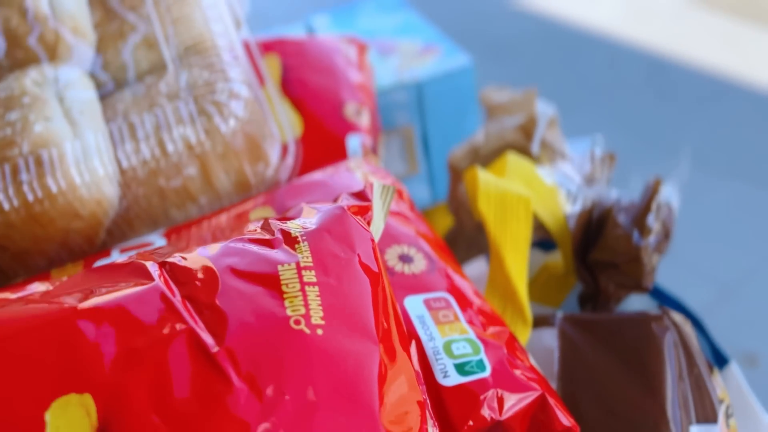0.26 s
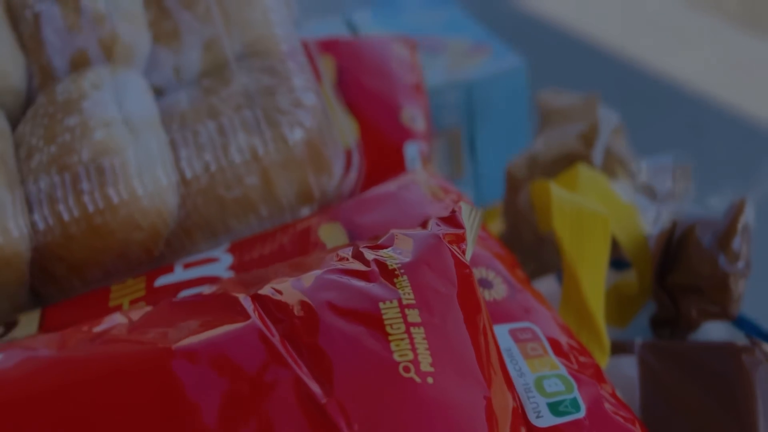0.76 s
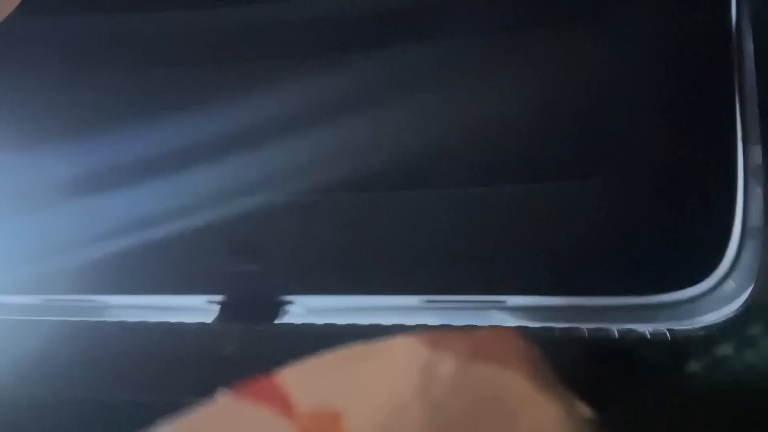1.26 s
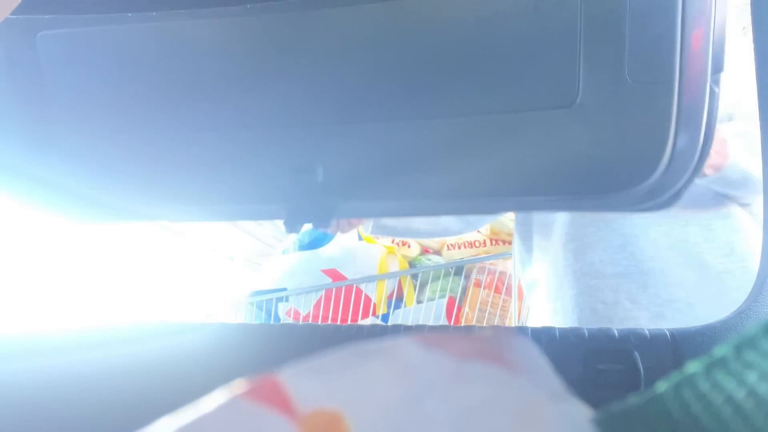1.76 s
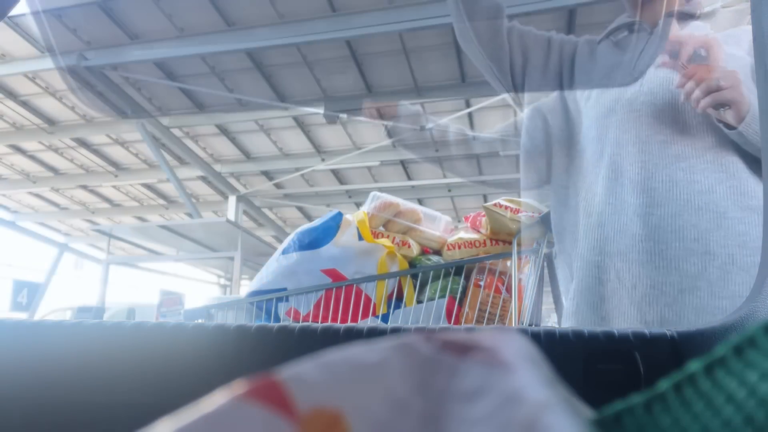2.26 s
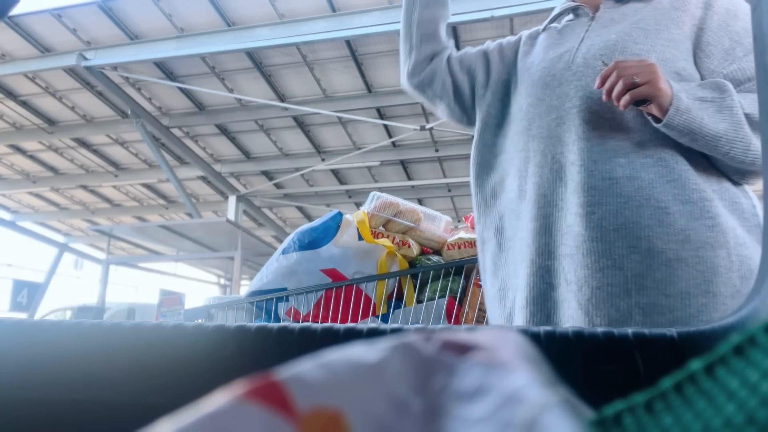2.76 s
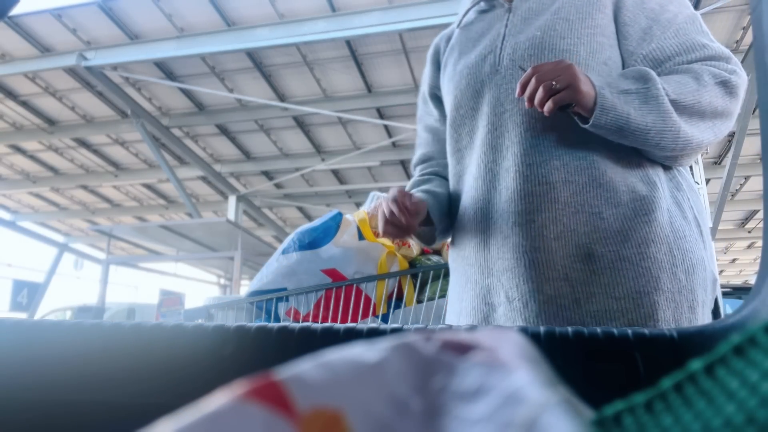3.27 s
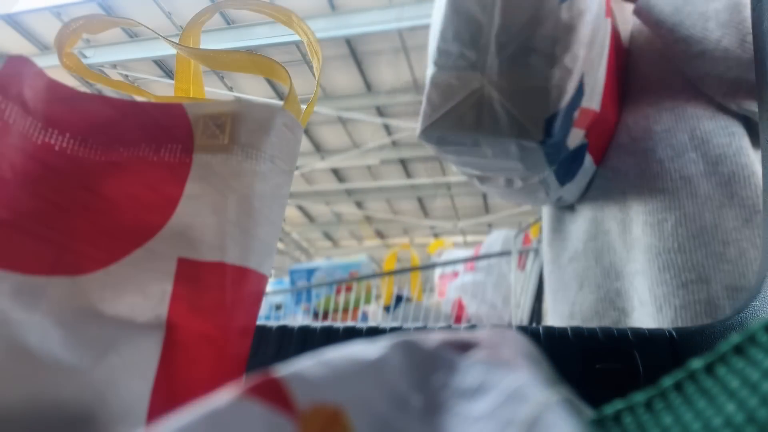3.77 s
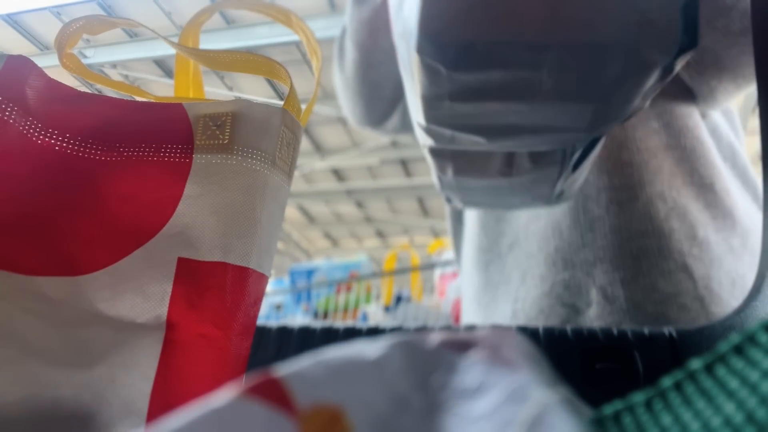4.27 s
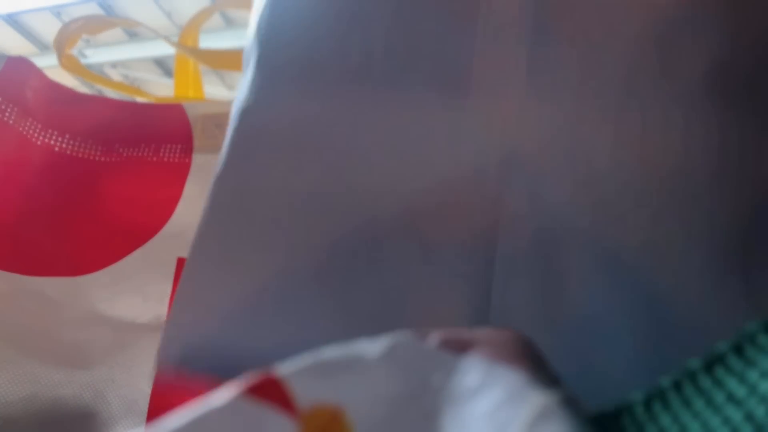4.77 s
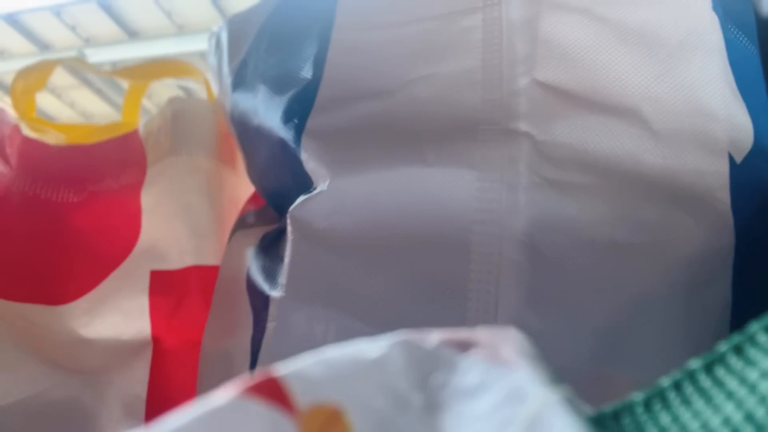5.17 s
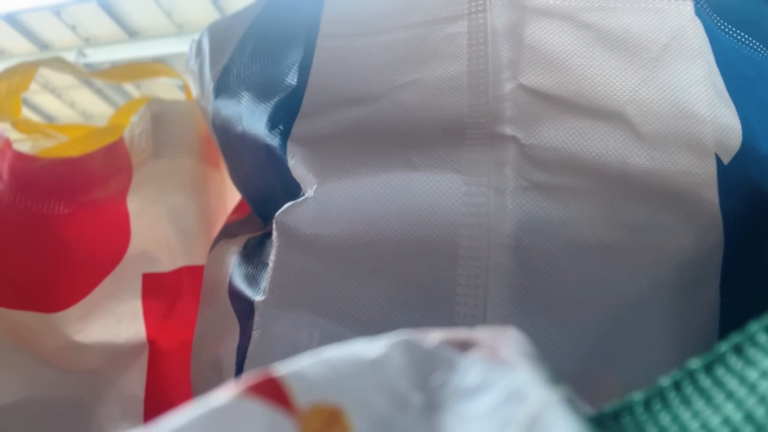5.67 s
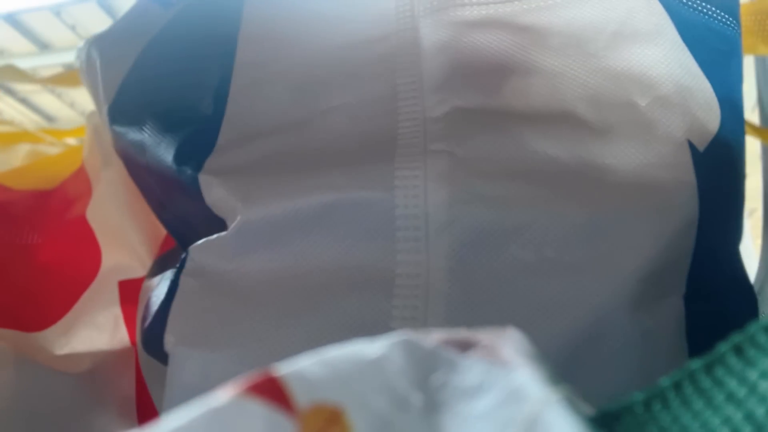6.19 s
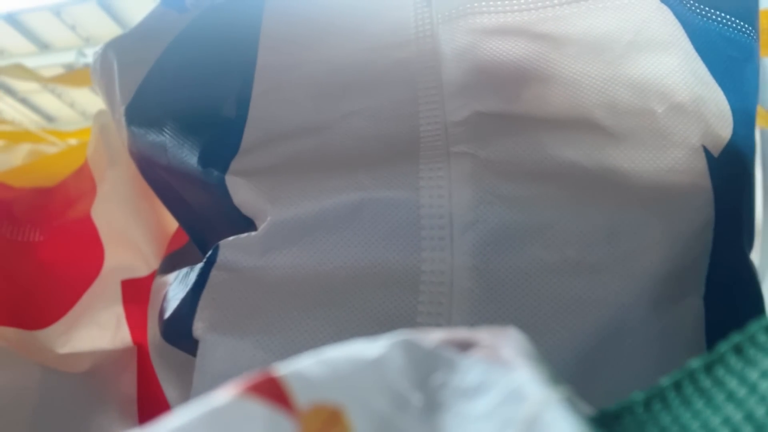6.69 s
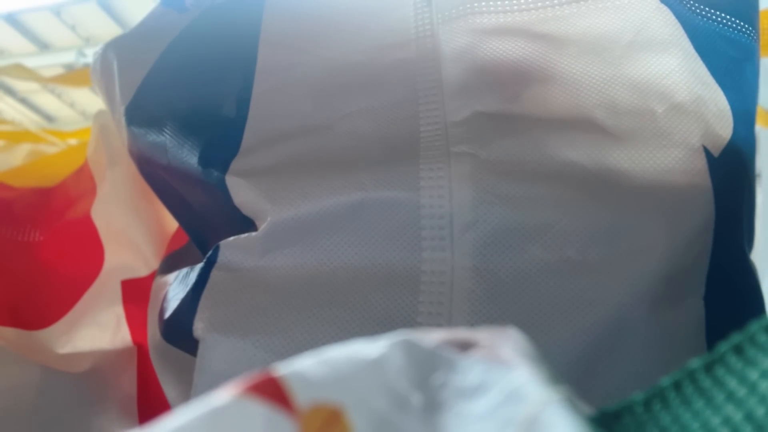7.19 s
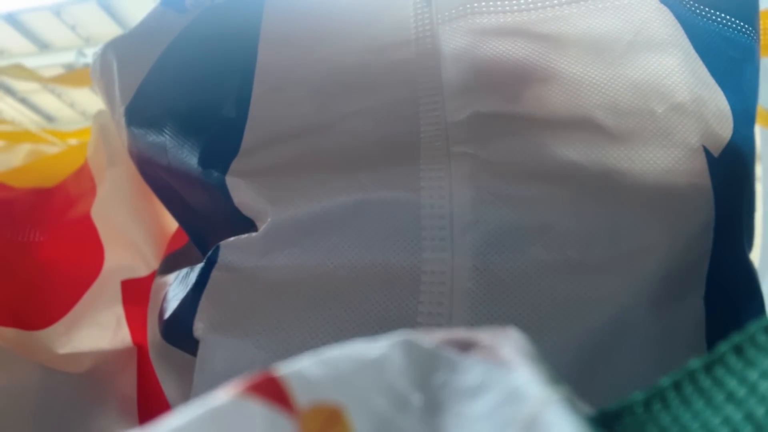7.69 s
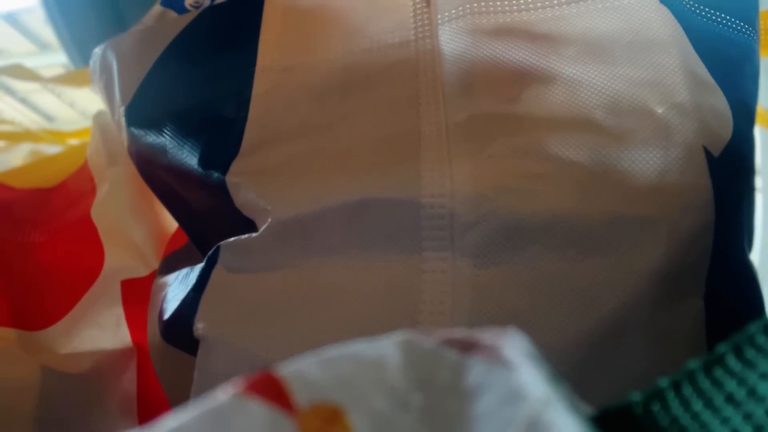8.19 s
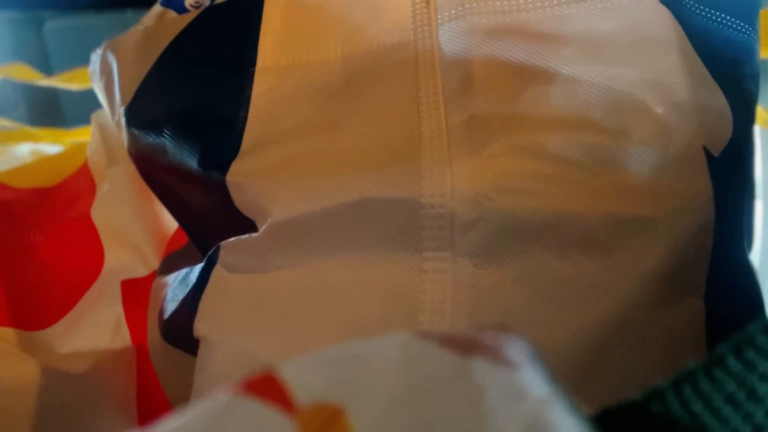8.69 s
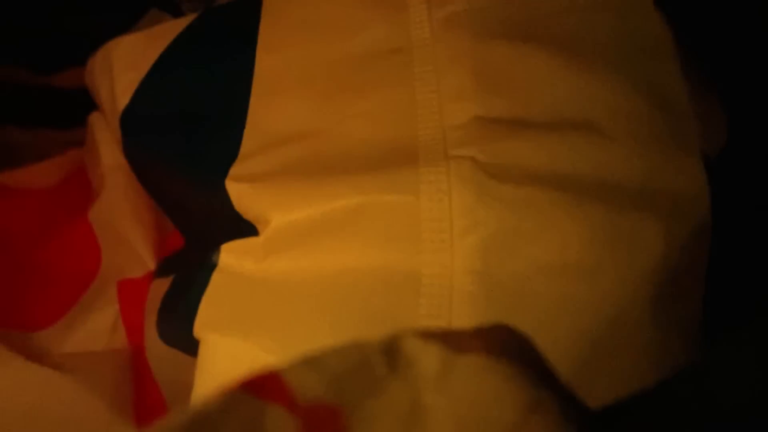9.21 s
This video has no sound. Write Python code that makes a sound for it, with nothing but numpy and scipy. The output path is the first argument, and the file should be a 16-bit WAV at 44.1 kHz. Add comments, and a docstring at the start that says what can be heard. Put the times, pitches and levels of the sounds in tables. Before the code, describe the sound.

From inside a car boot, the lock whirrs, the lid opens, stiff shopping bags rustle in and the lid slams, over low traffic rumble.

```python
"""Loading a car boot

Heard from inside the boot, in a roofed car park: traffic rumbles outside and engines pull past.
The lock motor whirrs, the catch lets go and the lid rises on hissing gas struts. Stiff shopping bags
slide in by stick-slip friction, their folds snapping, and the lid slams. Each impact excites the
damped modes of the panels; low booms and swells of rumble rise and die away."""
import sys
import numpy as np
from scipy import signal
from scipy.io import wavfile
from scipy.ndimage import uniform_filter1d

SR = 44100
rng = np.random.default_rng(int(sys.argv[2]) if len(sys.argv) > 2 else 0)


def unload_audio(sound):
    """Save the sound as a 16-bit wav file, at the path given as the first command line argument."""
    columns = np.transpose(np.atleast_2d(sound))
    # keep every value between -1 and 1, then stretch to whole-number steps
    steps = np.round(np.clip(columns, -1, 1) * 32767)
    wavfile.write(sys.argv[1], SR, steps.astype(np.int16))


N = 416744


def gain_of(db):
    """Amplitude ratio of a level in decibels."""
    return 10 ** (np.asarray(db) / 20)


def unit_rms(x):
    """The signal normalised to a mean square of one."""
    return x / np.sqrt(np.mean(x ** 2) + 1e-20)


def at_frequency(points, hz):
    """Interpolation of (frequency, value) points on a logarithmic frequency axis."""
    f, value = np.transpose(points)
    return np.interp(np.log(hz + 1), np.log(f + 1), value)


def add(mix, start, sound):
    """Superposition of a stereo sound on the mix, from a start time in seconds."""
    part = mix[:, round(start * SR):][:, :sound.shape[1]]
    part += sound[:, :part.shape[1]]


def curves(rows):
    """Linear interpolation of a table in time, with a window that is zero outside its span."""
    times, *columns = np.transpose(rows)
    t = np.arange(N) / SR
    window = np.clip(np.minimum(t - times[0], times[-1] - t) / 0.023, 0, 1)
    return window, [np.interp(t, times, column) for column in columns]


def held(start, length, rise, t60, after_db=0.):
    """Envelope of a driven vibration: linear rise, hold, a step of after_db, then free decay."""
    t = np.arange(N) / SR - start
    late = np.maximum(t - length, 0)
    return np.clip(t / rise, 0, 1) * gain_of(after_db * np.minimum(late / 0.0068, 1) - 60 * late / t60)


def wander(shape, span):
    """Slow random fluctuation: white noise under a moving average of span points."""
    return unit_rms(uniform_filter1d(rng.standard_normal(shape), size=span))


def noise(spectrum, patchy_db, flicker_db, size=1024):
    """Partly coherent stereo noise of unit rms, with drifting spectral patches and broadband flicker."""
    # likeness of left and right: f/Hz, coherence
    coherence = [(60, 1), (130, 0.99), (300, 0.86), (700, 0.086), (1500, 0.042), (4000, 0.073),
                 (15000, 0.16)]
    frames, hz = 4 * N // size + 5, np.fft.rfftfreq(size, 1 / SR)
    a, b, c, d, patches = rng.standard_normal((frames, len(hz), 5)).T
    patches = unit_rms(uniform_filter1d(uniform_filter1d(patches, size=7, axis=0), size=9, axis=1))
    flicker = wander(frames, span=3)
    alike = at_frequency(coherence, hz)[:, None]
    delay = np.exp(-2j * np.pi * 0.00051 * hz)[:, None]  # the right channel lags by 0.51 ms
    left = a + 1j * b
    right = alike * delay * left + np.sqrt(1 - alike ** 2) * (c + 1j * d)
    gain = gain_of(at_frequency(spectrum, hz)[:, None] + patchy_db * patches + flicker_db * flicker)
    _, pair = signal.istft(gain * np.array([left, right]), nperseg=size, noverlap=3 * size // 4)
    return unit_rms(pair[:, :N])


def stick_slip(per_s, spread_db, t60, share):
    """Friction envelope of unit rms: a steady part plus random slips that decay exponentially."""
    slips = gain_of(spread_db * np.minimum(rng.exponential(1, N), 3)) * (rng.random(N) < per_s / SR)
    slips = signal.lfilter([1], [1, -gain_of(-60 / (t60 * SR))], slips)
    return unit_rms(1 - share + share * unit_rms(uniform_filter1d(slips, size=40)))


def two_bands(burst, centre_hz, spread):
    """Band-pass filtering of a burst into a dull part about centre_hz and a sharp part at 8-15 kHz."""
    dull = signal.butter(2, [centre_hz / spread, centre_hz * spread], "bandpass", fs=SR, output="sos")
    sharp = signal.butter(2, [8000, 15000], "bandpass", fs=SR, output="sos")
    return unit_rms(signal.sosfilt(dull, burst)), unit_rms(signal.sosfilt(sharp, burst))


def arrive(pair, pan_db, own):
    """Time and level cues: the right channel is the left 3 samples later, plus its own reflections."""
    right = np.sqrt(1 - own ** 2) * np.roll(pair[0], 3) + own * pair[1]
    return gain_of(np.array([[.5], [-.5]]) * pan_db) * np.array([pair[0], right])


def street():
    """Transmitted traffic noise, louder with the lid open; the rumble also swells as the body shudders."""
    # noise reaching the boot: t/s, then relative level/dB of rumble, tyre wash and far hiss
    levels = [(0.0, -50, -52.5, -65), (0.75, -40.5, -53.5, -63), (1.39, -35.5, -54, -72),
              (2.31, -27.5, -44.5, -62.5), (3.2, -30, -46.5, -65.5), (4.55, -30.5, -47.5, -82.5),
              (6.45, -31, -46.5, -67.5), (7.8, -35.5, -44.5, -65), (8.89, -28, -52, -75),
              (9.1, -39.5, -61.5, -74), (9.45, -42, -88, -85.5)]
    # spectra of the three: f/Hz, relative level/dB
    rumble_spectrum = [(12, -51), (20, -40), (36, -10.5), (59, 10), (86, -7), (116, -1.5), (150, -15),
                       (209, -14), (300, -26), (390, -45), (660, -120)]
    wash_spectrum = [(71, -37), (120, -3), (134, -4.5), (153, -20), (257, -13), (371, -19.5), (513, -19.5),
                     (617, -27), (773, -21), (1250, -24.5), (1800, -31.5), (2050, -32), (3500, -57),
                     (4550, -87), (7700, -120)]
    hiss_spectrum = [(1470, -18.5), (2500, -5), (4080, -11), (4500, -13), (5700, -12.5), (9290, -20.5),
                     (10300, -19), (13000, -20), (15500, -25)]
    # the body shudders at the unlocking and the slam: t/s, duration/s, level/dB
    shudders = [(1.02, 0.21, -23), (8.994, 0.12, -12)]
    _, (rumble_db, wash_db, hiss_db) = curves(levels)
    shake = sum(gain_of(db) * held(start, length, rise=0.07, t60=0.47) for start, length, db in shudders)
    rumble = noise(rumble_spectrum, patchy_db=1.0, flicker_db=0.0, size=4096)
    wash = gain_of(wash_db + 4.5) * noise(wash_spectrum, patchy_db=2.0, flicker_db=-0.1)
    hiss = gain_of(hiss_db - 0.5) * noise(hiss_spectrum, patchy_db=.8, flicker_db=.6)
    return (gain_of(rumble_db - 1.0) + shake) * rumble + wash + hiss


def engines():
    """Periodic firing gives each passing engine a tone and its octave, which glide with its speed."""
    # pitch glides: t/s of start, turn and end, firing f/Hz at each of the three, relative level/dB
    passes = [(1.354, 2.294, 2.36, 50.04, 59.43, 61.6, -33.5), (3.005, 3.482, 4.8, 61, 63.76, 55.9, -32.5),
              (3.67, 5.22, 5.8, 58, 72.24, 57.96, -28.5), (5.43, 6.414, 8.7, 71.3, 77.35, 87.5, -37.5),
              (6.409, 7.49, 7.4, 64, 43.54, 48.4, -36), (7.583, 8.163, 8.6, 56, 64, 60, -33.5)]
    out = np.zeros((2, N))
    for *course, db in passes:
        window, (hz,) = curves(list(zip(course[:3], course[3:])))
        phase = 2 * np.pi * (np.cumsum(hz) / SR + rng.random()) + np.array([[0], [.4]])  # right leads
        unsteady = 1 + 0.029 * wander(N, span=3000)
        tone = np.sin(phase) + gain_of(-16.5) * np.sin(2 * phase)
        out += gain_of(db + 3.0) * uniform_filter1d(window, size=6000) * unsteady * tone
    return out


def squeak():
    """A thin, far squeak: a gliding tone under random amplitude modulation."""
    # course of the squeak: t/s, f/Hz, level/dB
    course = [(0.535, 9000, -58), (0.585, 9100, -61), (0.78, 8900, -83)]
    window, (hz, db) = curves(course)
    flutter = abs(wander(N, span=400))
    return window * flutter * gain_of(db) * np.sin(2 * np.pi * np.cumsum(hz) / SR)


def struts():
    """Flow noise: gas hisses through the strut valves as the lid rises."""
    # course of the hiss: t/s, level/dB
    levels = [(1.45, -77), (1.7, -64), (2.0, -60), (2.2, -57.5), (2.44, -57), (2.5, -73), (2.85, -66)]
    # spectrum of the hiss: f/Hz, relative level/dB
    spectrum = [(3530, -26), (6000, -15.5), (8500, -18), (9600, -5.5), (10600, -9), (11700, -2),
                (12800, -9), (13600, -6), (14400, -35), (15000, -41.5)]
    window, (db,) = curves(levels)
    return window * gain_of(db) * noise(spectrum, patchy_db=1.5, flicker_db=.5)


def lock():
    """Gear friction and a frequency-modulated motor whine as the catch moves; loose trim rattles after."""
    # strokes: t/s, duration/s, motor f/Hz, level/dB of grind, treble, whine and octave, tail T60/s
    strokes = [(0.984, 0.072, 2000, -24, -43, -39, -46.5, 0.3),
               (1.145, 0.044, 1830, -28.5, -51, -50, -55.5, 0.2),
               (1.185, 0.072, 1823, -40.5, -40, -37, -50.5, 0.17),
               (1.253, 0.099, 1830, -29.5, -65.5, -41.5, -57, 0.24),
               (8.973, 0.068, 2055, -19.5, -34, -37, -53, 0.77)]
    # spectra of the gears' grind and treble: f/Hz, relative level/dB
    grind_spectrum = [(88, -15.5), (150, 0.5), (389, -10), (692, -6), (1310, -23), (1820, -22.5),
                      (2190, -34), (2420, -31), (3000, -36), (3900, -59.5), (6600, -120)]
    treble_spectrum = [(1290, -35), (2200, 5), (2430, 4), (3000, -5), (3930, -4), (4980, -8), (5450, -4.5),
                       (6520, 0), (7800, -19.5), (12600, -3), (15500, -27.5)]
    # drop at the end of a stroke: step/dB of grind, treble, whine and octave
    end_steps = [-11.5, -20.5, -31.5, -24.5]
    # soft puffs of rattling trim: t/s, grind level/dB, treble level/dB
    rattles = [(1.058, -27, -57), (1.119, -50, -60), (9.055, -34, -57), (9.09, -29.5, -52),
               (9.117, -31, -52), (9.154, -40, -56), (9.186, -40, -74), (9.224, -52, -79),
               (9.31, -61.5, -60)]
    grind = noise(grind_spectrum, patchy_db=2.0, flicker_db=2.0, size=256)
    treble = noise(treble_spectrum, patchy_db=2.0, flicker_db=1.5, size=256)
    pitch_waver, roughness = wander((2, N), span=150)
    t, out = np.arange(N) / SR, np.zeros((2, N))
    for start, length, hz, *levels_db, t60 in strokes:
        phase = 2 * np.pi * np.cumsum(hz + 110 * pitch_waver) / SR
        whine, octave = (1 + .7 * roughness) * np.sin([phase, 2 * phase])
        for part, db, step_db in zip((grind, treble, whine, octave), levels_db, end_steps):
            out += gain_of(db) * held(start, length, rise=0.021, t60=t60, after_db=step_db) * part
    for start, grind_db, treble_db in rattles:
        puff = np.clip(np.minimum(t - start, start + 0.022 - t) / 0.0041, 0, 1)  # 22 ms long
        out += puff * (gain_of(grind_db) * grind + gain_of(treble_db) * treble)
    return out


def bag_friction():
    """Stick-slip friction: stiff woven plastic drags and fizzes as the bags slide in."""
    # rubbing of bags and cloth: t/s, drag level/dB, fizz level/dB
    levels = [(2.6, -68, -71), (2.95, -72, -68), (3.45, -51, -73), (3.65, -45.5, -59.5), (4.4, -50.5, -63),
              (4.71, -46, -61.5), (4.88, -44.5, -50), (4.95, -45, -53), (5.015, -14.5, -30.5),
              (5.035, -20, -33.5), (5.075, -23, -30.5), (5.13, -37.5, -42), (5.22, -44, -54.5),
              (5.38, -42, -50.5), (5.57, -52, -59), (5.72, -48.5, -69), (5.8, -47, -52), (5.93, -40, -52),
              (6.04, -36, -41.5), (6.14, -32, -41), (6.17, -37, -47), (6.21, -48, -62), (6.3, -47.5, -49.5),
              (6.45, -56, -55.5), (6.56, -50, -66), (6.7, -56, -96)]
    # spectra of the two: f/Hz, relative level/dB
    drag_spectrum = [(59, -40), (100, -5), (192, -29), (283, -2), (417, -22), (521, -18.5), (579, -27),
                     (671, -9.5), (3500, -35.5), (4550, -44), (7700, -120)]
    fizz_spectrum = [(1290, -11.5), (2200, -4.5), (2740, -16.5), (4160, -14.5), (5060, -10.5), (6630, -14),
                     (7740, -18), (9340, -15), (11800, -12), (13800, -11.5), (15500, -41)]
    drag = noise(drag_spectrum, patchy_db=2.5, flicker_db=1.5, size=512)
    drag *= stick_slip(per_s=250, spread_db=2.5, t60=.03, share=.55)
    fizz = noise(fizz_spectrum, patchy_db=2.0, flicker_db=-2.0, size=256)
    fizz *= stick_slip(per_s=210, spread_db=6.2, t60=0.0061, share=0.065)
    window, (drag_db, fizz_db) = curves(levels)
    return window * (gain_of(drag_db) * drag + gain_of(fizz_db) * fizz)


def bag_snaps():
    """Buckling: the folds of the bags snap, each radiating a few milliseconds of noise."""
    # the clearest snaps: t/s, relative level/dB of the sharp and the dull band
    clear_snaps = [(3.9384, -29, -69), (3.9973, -34, -63), (4.101, -53, -50), (4.113, -53, -47),
                   (4.3819, -30, -29.5), (4.4563, -34, -30), (4.4802, -40, -26.5), (4.4973, -38, -24.5),
                   (4.574, -50, -52), (4.635, -50, -46), (4.669, -51, -36), (4.685, -44, -48),
                   (4.7557, -29, -28), (4.8888, -23, -23.5), (4.9504, -33, -32), (5.1632, -38, -38),
                   (5.25, -44, -30), (5.2714, -26, -48), (5.4377, -48, -45), (5.5129, -28.5, -67),
                   (5.5662, -36, -33), (5.706, -40, -33), (5.7139, -20, -19), (5.7703, -21, -62),
                   (5.9723, -27, -27), (6.0003, -17.5, -24.5), (6.1925, -40, -35), (6.234, -40, -31.5),
                   (7.383, -52, -49), (7.478, -52, -46), (7.883, -46, -32)]
    small_snaps = np.c_[rng.uniform(3.9, 5.4, size=30), rng.normal(-54, 6, size=(30, 2))]  # same columns
    t, out = np.arange(1000) / SR, np.zeros((2, N))
    envelope = (1 - np.exp(-t / 0.0049)) * gain_of(-60 * (t / 0.0079) ** 2)
    for start, sharp_db, dull_db in [*clear_snaps, *small_snaps]:
        dull, sharp = two_bands(rng.standard_normal((2, len(t))), 4500, spread=2.66)
        snap = envelope * (gain_of(dull_db) * dull + gain_of(sharp_db) * sharp)
        add(out, start, arrive(snap, pan_db=rng.normal(0, 3.5), own=0.69))
    return out


def booms():
    """Damped sinusoids: low booms and swells of rumble that rise and die away, with a weaker octave."""
    # low booms and swells: t/s, relative level/dB, f/Hz, rise time/s, T60/s
    swells = [(1.032, -11.5, 43.4, 0.017, 0.39), (1.2, -11, 53.5, 0.055, 0.44),
              (2.198, -12, 53, 0.062, 0.39), (2.417, -4.5, 50, 0.0062, 0.061),
              (4.989, 6.5, 73.8, 0.017, 0.17), (4.996, -5, 43.5, 0.013, 0.25),
              (8.551, -10, 58.5, 0.052, 0.71), (9.019, -2.5, 47.38, 0.022, 0.88),
              (9.039, -23.5, 199.5, 0.022, 0.63), (9.377, -10, 49.5, 0.027, 0.37)]
    t, out = np.arange(SR) / SR, np.zeros((2, N))
    for start, db, hz, rise, t60 in swells:
        envelope = gain_of(db - 60 * t / t60) * (1 - np.exp(-t / rise)) ** 2
        phase = 2 * np.pi * hz * t + np.array([[0], [.55]])  # right leads
        add(out, start, envelope * (np.sin(phase) + 0.13 * np.sin(2 * phase)))
    return out


def panel_ring(t, excitation, ring_scale):
    """Modal response: damped panel modes convolved with an impulse and its brief contact chatter."""
    # modes of lid and boot: f/Hz, relative level/dB, T60/s before scaling by ring_scale
    panels = [(101.5, -3.5, 0.22), (136.5, -3, 0.082), (175, 0.5, 0.12), (226, 4, 0.078), (303.3, 3, 0.043),
              (405.5, -3.5, 0.058), (483, -12.5, 0.053), (627, -9, 0.035), (690, -7, 0.044),
              (840, -7.5, 0.03), (1010, -8.5, 0.04), (1243, -10.5, 0.024), (1405, -17.5, 0.038),
              (1570, -16, 0.059), (1830, -13, 0.026), (2170, -17.5, 0.027), (2570, -21.5, 0.03),
              (3300, -30.5, 0.018)]
    hz, db, t60 = np.transpose(panels)[:, :, None]
    detune, scatter_db, start_phase, side_phase = rng.standard_normal((4, len(panels), 1))
    envelope = gain_of(at_frequency(excitation, hz) + db + scatter_db - 60 * t / (ring_scale * t60))
    envelope *= 1 - np.exp(-t * hz / 0.89)  # a mode builds up over 0.89 of its own cycles
    contact = t[:1500]
    chatter = rng.standard_normal((2, len(contact))) * gain_of(-60 * contact / (ring_scale * 0.023))
    force = (contact == 0) + 0.59 * chatter / np.linalg.norm(chatter[0])
    phase = 2 * np.pi * hz * (1 + 0.052 * detune) * t
    # dividing by the force spectrum at each mode keeps that mode near its set level
    drive = np.clip(abs(force @ np.exp(-1j * phase[:, :len(contact)]).T), .5, 2)[:, :, None]
    apart = 3 * np.minimum(hz / 291, 1) ** 2 * side_phase  # below 291 Hz the sides draw into phase
    modes = np.array([envelope / drive[side] * np.sin(phase + 3 * start_phase + side * apart)
                      for side in (0, 1)])
    ring = signal.fftconvolve(modes.sum(axis=1), force, axes=1)[:, :len(t)]
    return signal.sosfilt(signal.butter(3, 4200, fs=SR, output="sos"), ring)


def crack(t, db, hz, pan_db, ring_scale):
    """Contact transient: a short burst of noise in two bands, brighter for harder blows."""
    dull, sharp = two_bands(rng.standard_normal((2, len(t))), hz, spread=1.47)
    dull *= gain_of(-60 * t / (ring_scale * 0.028)) + gain_of(-20 - 60 * t / 0.07)  # burst and faint tail
    brighter_db = 0.45 * max(db + 28.5, 0)  # blows above -28.5 dB gain treble
    sharp *= gain_of(-3 + brighter_db - 60 * t / (ring_scale * 0.02))
    attack = 1 - np.exp(-t / 0.00099)
    return gain_of(db) * attack * (arrive(dull, pan_db, own=0.97) + arrive(sharp, pan_db, own=0.4))


def blows():
    """Impact excitation: each blow on lid, lock or floor rings the panels, with a crack on top."""
    # impacts: t/s, relative level/dB of low, middle, high and top modes and of the crack,
    # crack f/Hz, left-over-right level/dB
    impacts = [(0.856, -19, -9, -21.5, -26, -42.5, 4500, -2), (0.868, -17, -15, -23, -36, -62, 2500, 1),
               (0.998, -32, -41, -26, -18, -36.5, 4000, 4), (1.04, -8.5, -10.5, -11, -9, -32, 3800, 0),
               (1.166, -20.5, -28, -21, -18, -65, 3000, -2), (1.243, -17, -25, -22, -30, -19, 6400, 1.5),
               (1.288, -25, -26, -14.5, -16, -33, 3800, 4), (1.294, -22, -18, 1, -1, -15.5, 3820, 0.5),
               (1.309, -12.5, -19, -10, -20, -36, 4000, -1), (1.319, -21.5, -39, -27, -20, -59, 3000, -2),
               (1.34, -20, -35, -37, -29, -34.5, 6200, 1.5), (1.72, -28, -33.5, -55, -57, -67, 3000, 1),
               (1.907, -38, -42, -31, -28, -54, 4000, -2), (1.918, -30.5, -36, -24, -45, -65, 3000, -2),
               (1.981, -44, -30, -24.5, -33, -46, 4000, -4), (1.991, -45, -34, -25, -44, -64, 3000, 4),
               (2.006, -48, -34, -23, -25, -51, 4000, 4), (2.021, -47, -32, -27, -29, -59, 4000, -3),
               (2.039, -45, -27.5, -27, -30, -68, 3000, -6), (2.435, -27.5, -14, -35, -24, -44, 4000, 1),
               (3.999, -27, -26, -31, -31, -49, 3500, 0.5), (4.036, -42, -28, -39, -28, -48, 4500, -1),
               (4.113, -49, -29, -24.5, -50, -62, 3500, -6), (4.505, -45, -35, -22.5, -23, -37, 3500, -5),
               (4.583, -24.5, -31, -36, -47, -68, 3500, -6), (4.594, -43, -42, -26, -25, -55, 3220, -6),
               (4.7228, -31, -20, -16.5, -9.5, -25, 2930, -5), (4.7256, -12.5, -17, -9, -12, -28, 2980, -4),
               (4.952, -37, -32, -20, -15.5, -47, 3520, -3.5), (4.984, -30, -20, -16, -23, -48, 3500, 3),
               (5.007, -10.5, -18, -15.5, -11, -38, 3520, -8), (5.016, -11, -25, -12, -16, -40, 3000, 2),
               (5.042, -18, -28, -11, -9, -43, 3500, -4), (5.063, -26, -24, -15, -11, -37, 4500, -4),
               (5.074, -24.5, -33, -14, -15, -26, 5000, -1), (5.094, -35, -34, -23, -17, -42, 4500, 2),
               (5.14, -34, -30, -23, -44, -54, 3500, -7), (5.23, -45, -28, -29, -34, -58, 3576, 3),
               (5.337, -44, -42, -29.5, -35, -60, 3500, -4), (5.379, -23.5, -35, -23, -30, -54, 3520, 1),
               (5.447, -33, -47, -44, -29, -50, 3470, -8), (5.53, -40, -46, -27.5, -39, -45, 3500, 0),
               (5.891, -38, -45, -30, -43, -60, 3500, 3), (5.918, -24.5, -43, -18.5, -35, -61, 3540, 0),
               (5.945, -39, -40, -30, -26, -44, 4500, -7), (5.967, -25.5, -35, -24.5, -17, -40, 4800, -6),
               (6.001, -26.5, -36, -18.5, -28, -52, 5060, -2),
               (6.03, -26.5, -27.5, -37, -28, -48, 4500, -7), (6.065, -35, -20, -24, -24, -37, 5000, -8),
               (6.092, -40, -38, -22, -8.5, -30.5, 5460, 0), (6.127, -30, -32, -19, -16, -23.5, 5470, -2),
               (6.144, -28, -25.5, -28, -27, -45, 5000, -9), (6.185, -22, -22, -20, -32, -52, 3500, -5),
               (6.283, -24.5, -34.5, -31, -38, -53, 3500, 7), (6.35, -41, -41, -33, -34, -60, 3480, -3),
               (6.374, -43, -52, -28, -35, -47, 3500, -3), (8.549, -34, -36, -31.5, -42, -52, 3500, -4),
               (8.574, -31, -33, -23.5, -31.5, -46, 3560, -1.5), (8.764, -34, -28, -37, -42, -77, 2980, 0),
               (8.986, -9, -24, -7.5, -14, -24, 6900, -7), (8.997, -12, -34, -19, 1.5, -18, 6900, 7.5),
               (9.012, -12, -22, -26, -4, -40, 3000, -9), (9.024, -19, -26, -10, -24, -21, 6000, -2),
               (9.032, -11.5, -17, -9.5, -26, -39, 5500, -2), (9.255, -15.5, -13, -28, -35, -59, 2980, 2.5),
               (9.283, -22.5, -22, -30, -33.5, -57, 3040, -11)]
    t, out = np.arange(8000) / SR, np.zeros((2, N))
    for start, low_db, mid_db, high_db, top_db, crack_db, crack_hz, pan_db in impacts:
        # the bags damp the panels during loading; the seated lid damps them more
        ring_scale = 0.79 if 3.5 < start < 6.7 else 0.46 if start > 9.1 else 1
        excitation = [(220, low_db), (405, mid_db), (623, high_db), (1320, high_db), (2000, top_db)]
        ring = arrive(panel_ring(t, excitation, ring_scale), pan_db, own=0.96)
        add(out, start, ring + crack(t, crack_db, crack_hz, pan_db, ring_scale))
    return out


def scene():
    """Superposition of all sources, as heard on the boot floor."""
    background = street() + engines() + squeak()
    return background + struts() + lock() + bag_friction() + bag_snaps() + booms() + blows()


def record(dry):
    """The microphone's frequency response, soft saturation of the loudest blows, then a band limit."""
    # microphone response: f/Hz, gain/dB
    response = [(2000, 1.5), (7000, 4.5), (8300, 1.5), (9500, 2.5), (13300, -4), (14300, -8.5),
                (15500, -27)]
    hz = np.linspace(0, SR / 2, 257)
    colour = signal.firwin2(255, hz, gain_of(at_frequency(response, hz)), fs=SR)
    saturated = np.tanh(signal.oaconvolve(dry, colour[None], "same"))
    low_pass = signal.firwin(511, 15800, window=("kaiser", 9), fs=SR)
    return signal.oaconvolve(saturated, low_pass[None], "same")


dry = scene()
out = record(dry)
unload_audio(out)
```